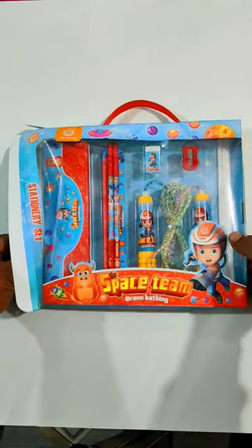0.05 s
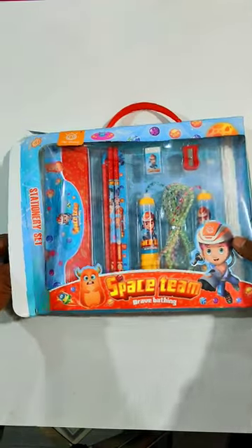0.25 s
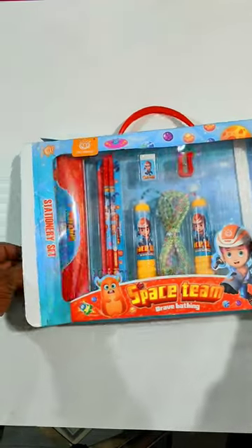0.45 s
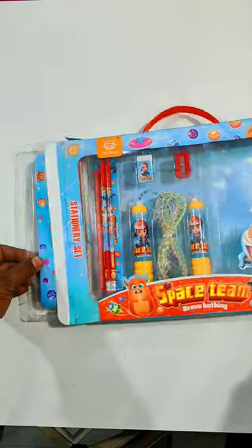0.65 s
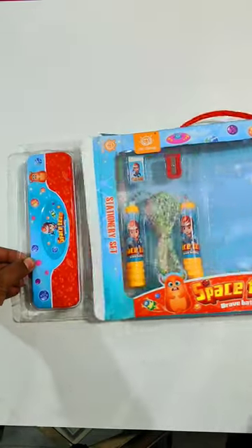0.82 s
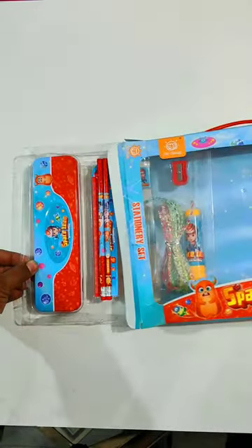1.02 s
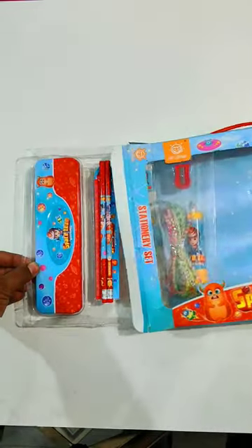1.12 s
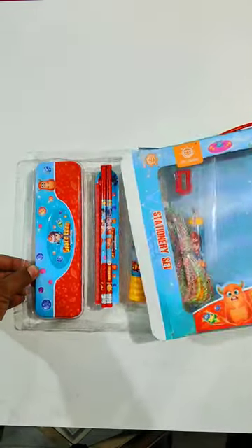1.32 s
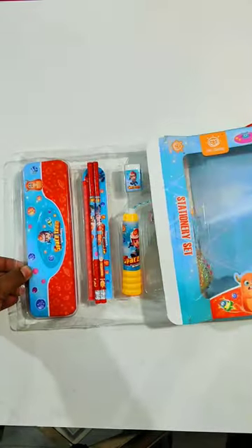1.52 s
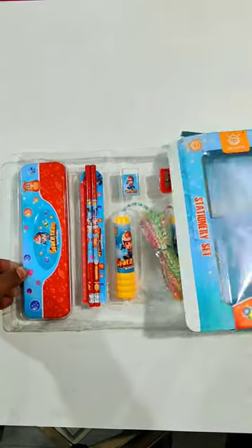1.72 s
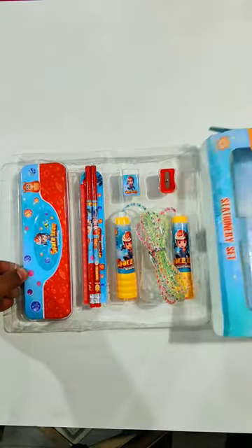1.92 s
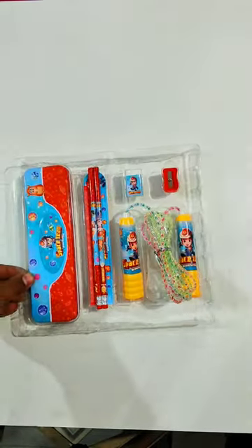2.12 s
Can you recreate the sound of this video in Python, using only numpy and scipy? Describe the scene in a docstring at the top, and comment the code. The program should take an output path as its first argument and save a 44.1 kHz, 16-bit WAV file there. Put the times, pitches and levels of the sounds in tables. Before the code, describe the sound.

Plastic tray scraping out of a card box, dense dry rasps with sharp snaps and hollow knocks

```python
"""A snap and a brief rub, then dense rasping: a thin moulded plastic tray is pulled out of a cardboard box.
Rubbing is stick-slip grain over hiss; snaps are noise bursts in four registers as ridges catch and let go.
Edges chatter (sagging noise swells), pitched knocks and pops are decaying sines; box and tray modes ring.
The box thuds softly on the table as it swings round; a small room and faint still air lie behind.
"""
import sys
import numpy as np
from scipy import signal
from scipy.fft import rfft, irfft
from scipy.io import wavfile
from scipy.ndimage import uniform_filter1d

SR = 44100
rng = np.random.default_rng(int(sys.argv[2]) if len(sys.argv) > 2 else 0)


def put_to_file(sound):
    """Save the sound as 16-bit audio at rate SR, in the file named by the first command-line argument."""
    columns = np.atleast_2d(sound).T  # one column per channel
    safe = np.clip(columns, -1, 1)
    whole_steps = np.round(safe * 32767)
    wavfile.write(sys.argv[1], SR, whole_steps.astype(np.int16))


N = 94815
T = np.arange(N) / SR
# above these the two channels drift apart
SOURCE_LIKENESS_HZ, ROOM_LIKENESS_HZ = 2150, 1090


def undb(db):
    """Decibels to gain."""
    return 10 ** (np.asarray(db) / 20)


def unit(x):
    """Scale to rms 1."""
    return x / np.sqrt(np.mean(x ** 2))


def band(x, lo_hz, hi_hz):
    """Causal band-pass."""
    edges_hz = [lo_hz, min(hi_hz, SR / 2 - 1)]
    return signal.sosfilt(signal.butter(N=3, Wn=edges_hz, btype="band", fs=SR, output="sos"), x)


def colour(x, points):
    """Zero-phase filter through (frequency [Hz], gain [dB]) points, log-frequency interpolation."""
    hz, db = np.array(points).T
    f = np.fft.rfftfreq(2 * N, 1 / SR)
    gain = undb(np.interp(np.log(f + 1), np.log(hz), db))
    return irfft(rfft(x, 2 * N) * gain)[..., :N]


def stereo(pair, likeness_hz):
    """Two unrelated signals become left and right: alike in the bass, apart in the treble."""
    size = pair.shape[1]
    alike = 1 / (1 + (np.fft.rfftfreq(size, 1 / SR) / likeness_hz) ** 2)
    mid, side = irfft(rfft(pair) * np.sqrt([1 + alike, 1 - alike]), size)
    return np.array([mid + side, mid - side]) / np.sqrt(2)


def walk(rate_hz):
    """Random wander with spread 1, interpolated between rate_hz points per second."""
    return unit(np.interp(T * rate_hz, np.arange(N), rng.standard_normal(N)))


def flecks(x):
    """Neighbouring pitches flare and fade together for some 10 ms, as the sheet catches at ever new spots."""
    fleck_db = 3.2
    grid = signal.stft(x, nperseg=768)[2]
    wander = unit(uniform_filter1d(rng.standard_normal(grid.shape[1:]), size=5, axis=0))  # along frequency
    flare = unit(undb(fleck_db * wander))
    return signal.istft(grid * flare)[1][:, :N]


# rubbing strength before RUB_DB: (time [s], hollow body level [dB], rasp and hiss level [dB])
RUB_LEVELS = [(0, -49.5, -54), (.067, -36, -45), (.11, -47, -57), (.175, -31.5, -31.5), (.205, -48, -48.5),
              (0.23, -30, -29.5), (.26, -35, -35.5), (.35, -48.5, -55), (.41, -36, -38), (.445, -29.5, -24),
              (0.47, -28, -32), (0.519, -27, -17), (.565, -30, -23), (0.593, -32.5, -19.5),
              (.645, -30, -32), (0.724, -20.5, -26), (.775, -30, -32), (.81, -26, -27), (.87, -29.5, -24.5),
              (.985, -20.5, -24), (1.009, -32.5, -32.5), (1.14, -38, -38.5), (1.226, -29.5, -29.5),
              (1.247, -22, -30), (1.28, -41, -45), (1.40, -37.5, -37), (1.45, -30, -43), (1.49, -47, -40),
              (1.58, -33.5, -24.5), (1.66, -38.5, -39.5), (1.78, -35, -27.5), (1.865, -55, -30),
              (1.91, -34, -55), (1.97, -51, -66), (2.011, -30.5, -32), (2.043, -57, -62), (2.15, -49, -49)]
# spectra of the rubbing parts: (frequency [Hz], gain [dB])
BODY_SPECTRUM = [(110, -36), (280, -8), (480, -1.5), (700, 3.5), (1050, 3), (1400, -6), (2000, -13.5),
                 (4000, -74)]
RASP_SPECTRUM = [(450, -37), (1200, -13), (1700, -2.5), (2500, -0.5), (3400, -5.5), (4400, -14.5),
                 (7000, -27.5)]
HISS_SPECTRUM = [(1000, -14), (4500, -8), (10500, -2.5), (15000, -10.5)]
RUB_DB, HISS_DB = 4, -7.5  # hiss relative to rasp
SLIPS_PER_S, SLIP_SPREAD_DB, SMOOTH_SHARE = 7000, 2.2, 0.7
JUDDER_HZ, JUDDER_DB = 111.08, 1.7


def rubbing():
    """Dense slips of uneven size over a smooth hiss; the pull judders and brief resonances flare up."""
    slip_db = SLIP_SPREAD_DB * np.minimum(rng.exponential(size=N), 3.5)
    slips = (rng.random(N) < SLIPS_PER_S / SR) * undb(slip_db)
    rough = unit(slips * rng.uniform(-0.97, 1, (2, N)))
    smooth = SMOOTH_SHARE * rng.standard_normal((2, N))
    grain = flecks(stereo(rough + smooth, SOURCE_LIKENESS_HZ))
    grain = grain * undb(JUDDER_DB * walk(JUDDER_HZ))
    body = unit(colour(grain, BODY_SPECTRUM))
    rasp = unit(colour(grain, RASP_SPECTRUM))
    hiss = unit(colour(grain, HISS_SPECTRUM))
    times, body_db, rasp_db = np.array(RUB_LEVELS).T
    body_gain = undb(RUB_DB + np.interp(T, times, body_db))
    rasp_gain = undb(RUB_DB + np.interp(T, times, rasp_db))
    return body_gain * body + rasp_gain * (rasp + undb(HISS_DB) * hiss)


# snaps and knocks of the tray, levels before SNAP_DB:
# (time [s], thump [dB], hollow body [dB], clack [dB], crack [dB], base decay [ms])
SNAP_EVENTS = [(.063, -31, -34, -35.5, -41, 3.4), (0.1256, -44, -36.5, -34, -42, 0.87),
               (0.2176, -62, -31, -35, -15.5, 1.2), (.2198, -25.5, -24, -25.5, -26, 2.2),
               (.3026, -27, -26.5, -23.5, -30, 1.6), (.540, -55, -28, -23.5, -32, 1.2),
               (.607, -32, -26, -20.5, -21.5, 0.69), (0.6237, -55, -44, -26, -29.5, 1.2),
               (0.7843, -27.5, -20, -18, -54, 2), (.803, -53, -22, -21, -26.5, 1.2),
               (.9487, -22, -19, -18, -23, 2.1), (.974, -35, -24, -21.5, -30, 1.3),
               (0.9773, -23.5, -16, -20.5, -46, 2), (1.1872, -25.5, -19.5, -22.5, -27.5, 1.9),
               (1.2351, -22.5, -20.5, -13, -20.5, 4), (1.3727, -22, -20.5, -16, -24, 1),
               (1.3752, -53, -17.5, -13, -19.5, 1.16), (1.5042, -28.5, -26, -22, -32, 1.4),
               (1.5363, -30.5, -36, -17, -23, 1.6), (1.752, -22.5, -26, -19, -30.5, 3.3),
               (1.7602, -20.5, -27.5, -26.5, -27, 1.3), (1.8003, -17, -19, -16.5, -20, 1.8),
               (1.8128, -24, -23.5, -18.5, -33, 4.5), (1.834, -29.5, -25, -19, -25, 2.3),
               (1.8465, -32, -36, -28.5, -39, 1.6), (2.025, -61, -34.5, -32.5, -40, 1.1)]
# registers, thump to crack: (low edge [Hz], high edge [Hz], decay relative to base [ratio])
SNAP_REGISTERS = [(302.5, 834, 6.1), (740, 1284, 2.3), (1337, 3424, 3.2), (3800, 15300, 2.07)]
SNAP_DB = -14


def snaps():
    """Each snap shakes the thin sheet for a few milliseconds; the thump lasts longest, then the clack."""
    size = 4096
    out = np.zeros((2, N + size))
    age_ms = np.arange(size) / SR * 1000
    for start, *levels, decay_ms in SNAP_EVENTS:
        i = int(start * SR)
        for db, (lo_hz, hi_hz, longer) in zip(levels, SNAP_REGISTERS):
            noise = stereo(rng.standard_normal((2, size)), SOURCE_LIKENESS_HZ)
            shake = noise * np.exp(-age_ms / (decay_ms * longer))
            # sqrt(10): level is the rms if the burst's energy filled size * 10 samples
            out[:, i:i + size] += undb(db) * np.sqrt(10) * unit(band(shake, lo_hz, hi_hz))
    return out[:, :N] * undb(SNAP_DB)


def swell(at_s, length_s, hz, width_hz):
    """A Gaussian swell of narrow-band trembling whose pitch sags as the contact slows."""
    sag_octaves_per_s = 5
    envelope = np.exp(-0.5 * ((T - at_s) / length_s) ** 2)
    pitch_hz = hz * 2 ** (-sag_octaves_per_s * np.clip(T - at_s, -2 * length_s, 2 * length_s))
    noise = stereo(rng.standard_normal((2, N)), SOURCE_LIKENESS_HZ)
    steady = band(noise, max(hz - width_hz / 2, hz / 2), hz + width_hz / 2)
    position = np.cumsum(pitch_hz / hz)  # read position [samples]
    tremble = np.array([np.interp(position, np.arange(N), side) for side in steady])
    return unit(tremble * envelope) * np.sqrt(np.mean(envelope ** 2))


# tight spots where an edge of the tray chatters on the card:
# (centre time [s], Gaussian length [s], centre pitch [Hz], level [dB])
SCUFF_EVENTS = [(0.441, 0.0089, 2550, -19), (.511, 0.009, 2630, -19), (0.590, 0.011, 2150, -16),
                (0.676, 0.011, 1710, -20), (0.88, 0.024, 804, -14.5)]
SCUFF_WIDTH_HZ = 520


def scuffs():
    """Short swells of chatter, each gathered round one falling pitch."""
    return sum(undb(db) * swell(at_s, length_s, hz, SCUFF_WIDTH_HZ)
               for at_s, length_s, hz, db in SCUFF_EVENTS)


# pitched knocks and pops of tray and box: (time [s], pitch [Hz], level before band-pass [dB])
POP_EVENTS = [(0.2196, 4630, 1), (.5085, 634, -3), (1.1861, 3340, -8.5), (1.3727, 1105, 3),
              (1.3756, 2680, -13), (1.4265, 953, -2), (1.512, 1086, -3), (1.5361, 1850, 0.5),
              (1.7605, 3300, -3.5), (1.8007, 3500, -2.5), (1.8335, 2300, -3)]
POP_DECAY_CYCLES, POP_BAND_HZ = 3, (460, 14600)


def pops():
    """Pitched knocks and pops of tray and box: a few fast-dying cycles each."""
    out = np.zeros(N)
    for at_s, hz, db in POP_EVENTS:
        cycles = np.maximum(T - at_s, 0) * hz
        out += undb(db) * np.sin(2 * np.pi * cycles) * np.exp(-cycles / POP_DECAY_CYCLES)
    return band(out, *POP_BAND_HZ)


# resonances of box and tray, the lowest one of the room: (frequency [Hz], width [Hz], gain [dB])
MODES = [(298, 10, -1), (627, 24, -2.5), (745, 19, -1.5), (809, 19, -1.5), (973, 12.6, -1),
         (1092, 9.3, -3), (1866, 6.4, 0), (2220, 12, 1), (2452, 11.6, -2.5), (3660, 1350, -10)]


def ring(x):
    """Box and tray pass the contact sound on and ring with their modes, along with one low room resonance."""
    f = np.fft.rfftfreq(2 * N, 1 / SR) + 1
    response = 1 + sum(undb(db) / (1 + 1j * (f * f - hz * hz) / (f * width_hz))
                       for hz, width_hz, db in MODES)
    return irfft(rfft(x, 2 * N) * response)[:, :N]


# soft bumps of the box, level before pan:
# (centre time [s], Gaussian length [s], centre pitch [Hz], level [dB])
THUD_EVENTS = [(1.154, .013, 105, -30), (1.2, 0.0069, 62, -33), (1.253, 0.0097, 110, -31),
               (1.537, 0.017, 55, -44), (1.82, .04, 134, -51)]
THUD_WIDTH_HZ, THUD_LEFT_MINUS_RIGHT_DB = 143, -14.5


def thuds():
    """Dull low bumps as the box shifts, weighted to the right."""
    bumps = sum(undb(db) * swell(at_s, length_s, hz, THUD_WIDTH_HZ)
                for at_s, length_s, hz, db in THUD_EVENTS)
    pan_db = np.array([[THUD_LEFT_MINUS_RIGHT_DB], [-THUD_LEFT_MINUS_RIGHT_DB]]) / 2
    return bumps * undb(pan_db)


# room decay by band: (low edge [Hz], high edge [Hz], T60 [s], level [dB])
ROOM_BANDS = [(141, 822, 0.58, -6), (645, 1585, 0.35, -3), (1615, 3810, 0.32, -4), (3580, 20600, 0.25, -5)]
ROOM_DELAY_S, ROOM_BUILD_S = 0.0051, 0.00057


def room(x):
    """A short diffuse tail that builds up just after the direct sound."""
    age_s = T[:SR // 2]
    build = 1 - np.exp(-np.maximum(age_s - ROOM_DELAY_S, 0) / ROOM_BUILD_S)
    noise = stereo(rng.standard_normal((2, len(age_s))), ROOM_LIKENESS_HZ)
    tail = 0
    for lo_hz, hi_hz, t60_s, db in ROOM_BANDS:
        fade = build * np.exp(-np.log(1000) * age_s / t60_s)
        tail = tail + undb(db) * band(noise, lo_hz, hi_hz) * fade / np.sqrt(np.sum(fade ** 2))
    return signal.fftconvolve(x, tail, axes=1)[:, :N]


# spectrum of the still air, relative: (frequency [Hz], gain [dB])
AIR_SPECTRUM = [(25, -14.5), (60, -27), (150, -26.5), (300, -13.5), (520, -14.5), (1200, -44),
                (15000, -39.5)]
AIR_DB = -39.5


def still_air():
    """Faint steady noise, shaped by the air spectrum."""
    noise = stereo(rng.standard_normal((2, N)), ROOM_LIKENESS_HZ)
    return undb(AIR_DB) * unit(colour(noise, AIR_SPECTRUM))


def scene():
    """Tray and box in the room; the reverb averages two draws of the snap noise, for a smoother tail."""
    sliding = rubbing() + scuffs() + pops()
    direct = ring(sliding + snaps())
    second_draw = ring(sliding + snaps())  # heard only through the reverb
    reverb = (room(direct) + room(second_draw)) / np.sqrt(2)
    return direct + reverb + thuds() + still_air()


# microphone colour: (frequency [Hz], left gain [dB], right gain [dB])
MIC_COLOUR = [(63.6, -14, -8), (347, -15, -15), (1130, -10, -6.5), (2150, -8, -10.5), (5900, -5.5, -5.5),
              (7100, -2.5, -5.5), (10400, -4, -17), (11930, -16.5, -24), (12850, -33, -9.5)]
CEILING, TOP_HZ = 0.9, 15500  # ceiling: full scale = 1


def record(dry):
    """Each microphone has its own colour; the loudest peaks are rounded and the top is cut steeply."""
    mics = np.array(MIC_COLOUR)
    left = colour(dry[0], mics[:, [0, 1]])
    right = colour(dry[1], mics[:, [0, 2]])
    heard = np.array([left, right])
    heard = heard / (1 + (heard / CEILING) ** 4) ** 0.25
    return signal.sosfilt(signal.ellip(8, 0.2, 70, TOP_HZ, fs=SR, output="sos"), heard)


dry = scene()
out = record(dry)
put_to_file(out)
```